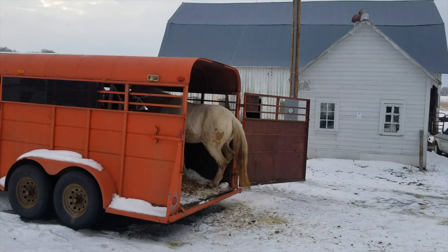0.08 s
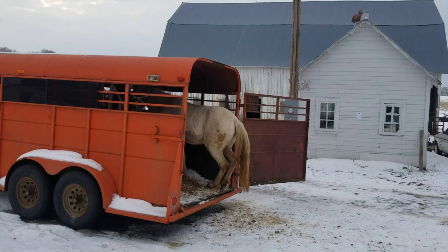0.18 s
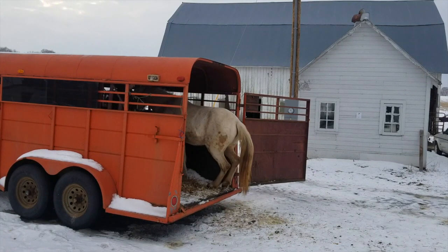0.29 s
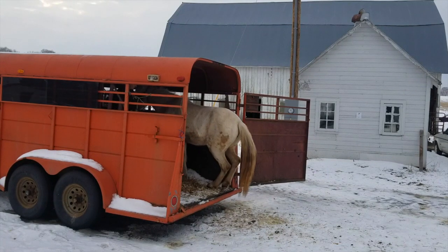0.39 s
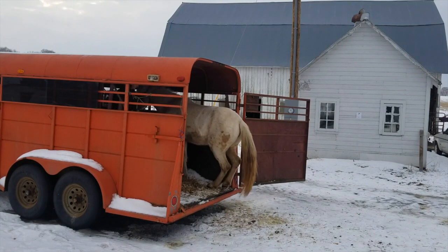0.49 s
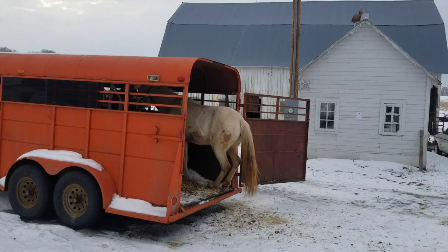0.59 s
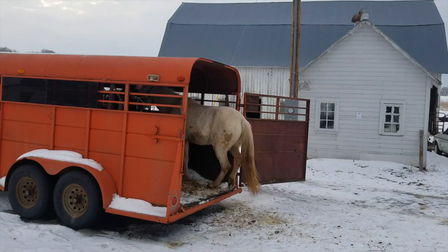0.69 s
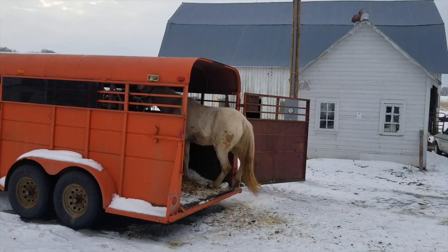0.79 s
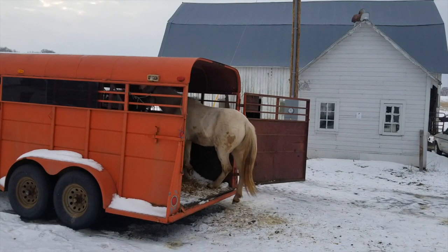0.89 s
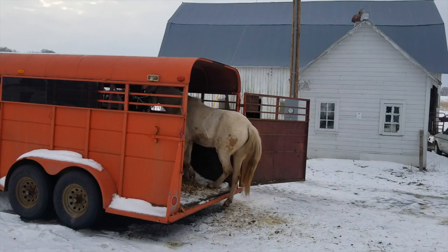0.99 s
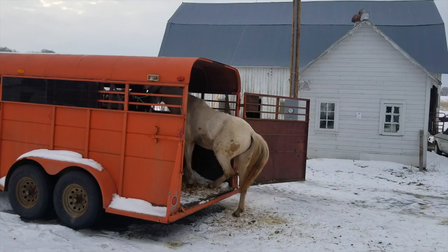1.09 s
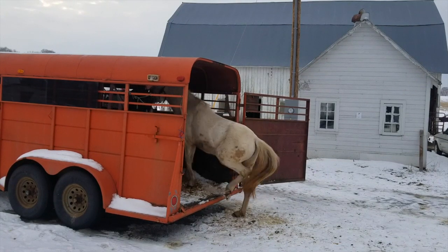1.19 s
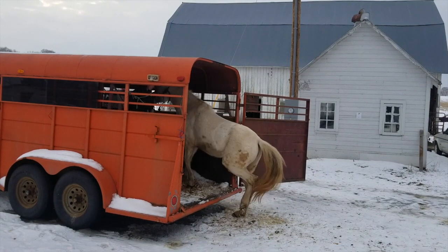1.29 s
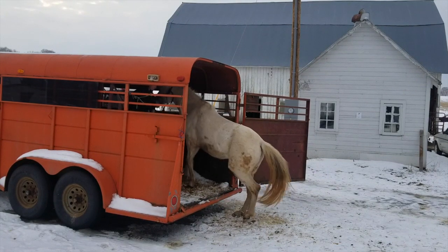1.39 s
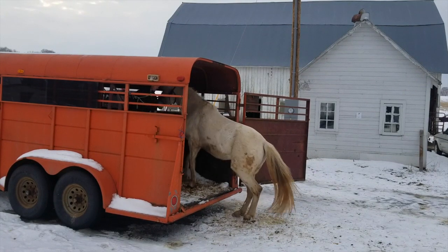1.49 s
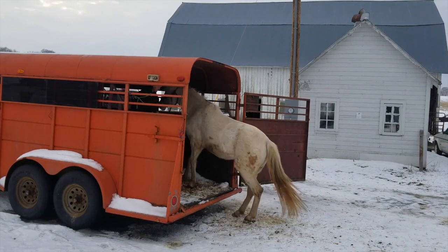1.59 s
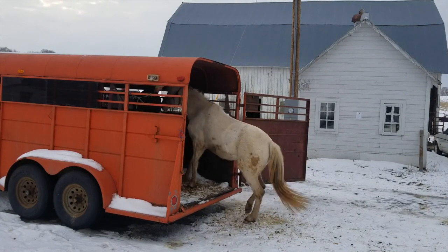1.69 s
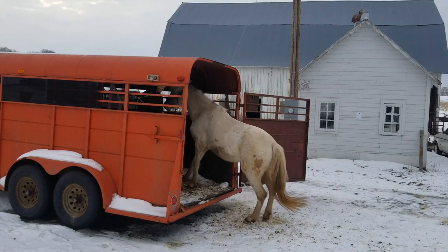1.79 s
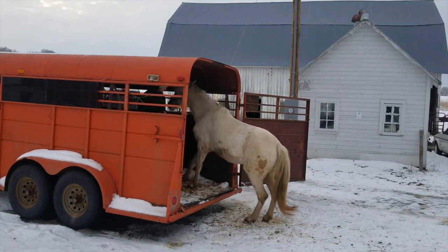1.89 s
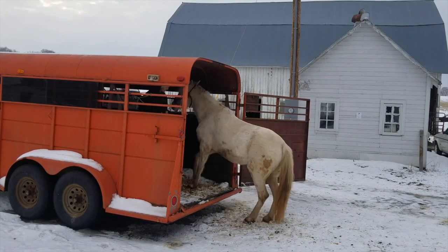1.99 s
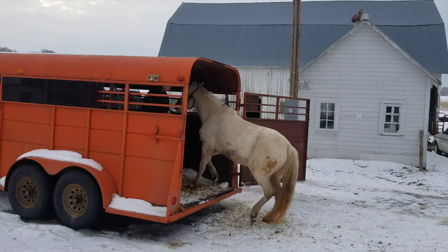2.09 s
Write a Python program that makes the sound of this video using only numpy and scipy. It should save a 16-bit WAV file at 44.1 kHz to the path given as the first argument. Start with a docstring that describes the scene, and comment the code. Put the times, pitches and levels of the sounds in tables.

```python
"""Horse hooves crunch and scrape over snow and grit as the horse backs out of a steel trailer into a yard.
Grinding is filtered noise full of tiny grains; sharp snaps and one rising slip stand out.
Blows ring the trailer and rattle its metal, the floor booms and rings on, and wind and yard hush lie under all.
A phone a few metres away listens through an open port and a covered one that hears mainly the bass."""
import sys
import numpy as np
from scipy import signal
from scipy.fft import rfft, irfft
from scipy.io import wavfile
from scipy.ndimage import uniform_filter1d

SR = 44100
rng = np.random.default_rng(int(sys.argv[2]) if len(sys.argv) > 2 else 0)


def decibels_to_gain(level_db):
    """Convert a level in decibels to a linear amplitude gain (20 dB per decade)."""
    exponent = np.asarray(level_db, float) / 20
    return 10 ** exponent


def to_wav(s):
    """Save 16-bit WAV."""
    ch = np.atleast_2d(s).T  # columns
    pcm = np.round(np.clip(ch, -1, 1) * 32767)  # PCM
    wavfile.write(sys.argv[1], SR, pcm.astype(np.int16))


N = 92610  # samples, 2.1 s

# Source levels are those before the gain of the ports.
# the floor flexes under shifting weight: start_s, length_s, level_db, pitch_hz
FLOOR_BOOMS = [(.0, 0.053, -48, 106), (0.085, 0.16, -55, 40.1), (.196, 0.029, -39, 89),
               (0.208, 0.084, -26, 72), (0.264, 0.34, -48, 51.3), (0.835, 0.049, -49, 68.7),
               (1.091, 0.052, -41.5, 90.5), (1.117, 0.13, -43, 41.2), (1.152, 0.054, -40.5, 90),
               (1.208, 0.076, -50.5, 96.6), (1.276, 0.082, -50, 43), (1.43, 0.11, -56.5, 47.8)]
# hooves grinding on snow and grit, one list per scrape: time_s, crunch_level_db, body_relative_db
GRINDS = [
    [(0.0, -52.5, 1.5), (0.026, -69, -16), (0.03, -62, -7), (0.07, -67.5, -1.5), (0.096, -77, 6.5),
     (0.126, -69, -1.5), (0.184, -68, -4), (0.195, -45, 6)],
    [(0.558, -86, 5), (0.57, -72, 0), (0.636, -61.5, -6), (0.646, -65, -1.5), (0.686, -70.5, -9),
     (0.704, -71, -1.5), (0.72, -67, -3)],
    [(1.055, -91, -14), (1.07, -62, -11), (1.078, -49, -6.5), (1.09, -52, 1), (1.115, -43, -3),
     (1.134, -46.5, 0), (1.153, -38.5, -1.5), (1.175, -54.5, -4), (1.22, -65, -2.5), (1.291, -68.5, -12),
     (1.33, -62, -7)],
    [(1.325, -76, -1), (1.344, -65, -20), (1.348, -46.5, -23), (1.361, -48, -10.5), (1.379, -61, -2),
     (1.395, -67.5, -1.5), (1.529, -66, -10.5), (1.54, -72, 6)],
    [(1.564, -83, 4), (1.584, -76, -30), (1.588, -68, -25), (1.612, -64, -23.5), (1.636, -63.5, -9.5),
     (1.758, -70, 1.5), (1.775, -55, -10)],
    [(1.775, -62, 3), (1.788, -66.5, 3), (1.797, -51.5, -22), (1.803, -51, -8), (1.819, -59, -7.5),
     (1.827, -55.5, -17), (1.849, -70, 0), (1.875, -61, -8)],
    [(1.86, -74, 2), (1.878, -66.5, -10), (1.934, -58.5, -8.5), (2.002, -62.5, -8.5), (2.03, -59, -15.5),
     (2.084, -70.5, -5), (2.1, -72, -9)],
]
# bright crunch of the grit, relative: pitch_hz, density_db_per_hz
CRUNCH_COLOUR = [(1120, -23), (1900, -31), (2440, -9), (2600, -1), (3100, 0), (4160, 3.5), (4630, -3.5),
                 (5070, -18), (6330, -9.5), (7630, -35.5), (10500, -40), (12300, -21.5), (13200, -24),
                 (14400, -16), (16000, -33)]
# duller thump below the crunch, relative: pitch_hz, density_db_per_hz
BODY_COLOUR = [(120, -32.5), (220, 6), (350, -1.5), (550, -4.5), (800, -4.5), (1070, 0.5), (1500, -0.5),
               (2100, -8), (2600, -32.5)]
# yard hush and wind, relative: pitch_hz, density_db_per_hz
HUSH_COLOUR = [(20, -11.5), (35, 0), (65, -4), (100, -2.5), (130, -5), (200, -16.5), (320, -14.5),
               (500, -40.5), (900, -34), (1700, -40.5), (2200, -16.5), (2750, -14), (3400, -23.5),
               (4200, -22.5), (4900, -42), (6300, -34), (7300, -55.5), (12500, -43.5), (13500, -32),
               (14200, -26), (15000, -27.5), (15700, -34)]
# hoof blows on the trailer: start_s, level_db, push_length_s, rattle_t60_s
BLOWS = [(.002, -48.5, 0.0048, 0.31), (0.192, -45.5, 0.00083, 1.1), (0.215, -40.5, 0.0022, 1.8),
         (0.264, -43.5, 0.0039, 0.98), (0.581, -45.5, 0.0034, 0.35), (1.075, -41, 0.0017, 0.15),
         (1.119, -38, 0.00086, 0.14), (1.141, -36.5, 0.0012, 0.59), (1.168, -53, 0.0043, 1.2),
         (1.735, -60, 0.0013, 0.23)]
# ringing modes of the trailer: pitch_hz, relative_level_db, longest_t60_s
TRAILER_MODES = [(42, -30, .5), (64, -30, .8), (90, -28, .5), (108, -28, .4), (163, -28, .5),
                 (237, -25, .5), (270, -22, .3), (320, -25, .5), (362, -24, .4), (447, -28, .5),
                 (564, -24, .25), (668, -27, .6), (715, -26, .3), (880, -29, .3), (1075, -26, .2),
                 (1320, -29, .2), (1610, -30, .15)]
# sheet-metal rattle after a blow, relative: pitch_hz, density_db_per_hz
RATTLE_COLOUR = [(60, -4.5), (150, 5), (300, -2), (500, -6.5), (800, -11), (1200, -14.5), (1600, -14.5),
                 (2200, -24.5), (4500, -24.5), (6000, -57)]
# single grit snaps: start_s, snap_level_db, knock_relative_db, knock_pitch_hz
SNAPS = [(.193, -50, 5.5, 1490), (0.202, -52, 10, 1330), (.2045, -59, 15.5, 660), (1.076, -38, 2.5, 388),
         (1.12, -43, -18, 1070), (1.143, -36, 0.5, 570), (1.1538, -32.5, -9, 1050), (1.3474, -43, -20, 600),
         (1.3505, -46, -17, 610), (1.3547, -38.5, -27, 1500), (1.3612, -37, -7.5, 970),
         (1.495, -54.5, 0.5, 920), (1.584, -46, -35, 600), (1.5996, -57, -25, 593), (1.633, -50, -24, 600),
         (1.6428, -46, -27, 604), (1.6496, -43, -33, 600), (1.678, -44, -28, 596),
         (1.7404, -54.5, 4.5, 490), (1.7972, -40, -12, 1420), (1.803, -45, 1.5, 994), (1.809, -49, 3, 1370),
         (1.826, -47.5, -1, 1410), (2.001, -48, -29, 600), (2.0106, -45.5, -29, 600),
         (2.0239, -43.5, -15, 1140), (2.033, -44.5, -34, 600)]
# the floor rings on, wavering as weight shifts: time_s, pitch_hz, rms_level_db
FLOOR_RING = [(0.268, 73.76, -61), (.285, 78.2, -41.5), (0.334, 75.5, -46.5), (.38, 63.8, -43.5),
              (.42, 76.3, -47), (.47, 67.2, -47.5), (.505, 72.5, -53.5), (0.534, 78.7, -49),
              (0.571, 73.7, -59), (.625, 69.5, -46.5), (.67, 78, -56), (.7, 82, -65.5), (.75, 82.8, -59.5),
              (0.809, 76, -68)]
# a hoof slips with a rising chirp: start_s, length_s, level_db, from_pitch_hz, to_pitch_hz
SLIP = (1.111, .017, -39, 550, 1350)
# covered port against the open one: pitch_hz, relative_level_db, lag_radians
COVER = [(30, -2.7, .27), (110, -2.9, .3), (170, -3.8, .45), (260, -4.9, .74), (470, -6, 1.),
         (620, -6.3, 1.28), (740, -8, 1.62), (900, -10.5, 1.68), (1130, -8.5, 1.9), (1260, -9, 2.4),
         (1380, -14.5, 2.66), (1520, -20.5, 2.76), (1950, -19, 3.3), (2240, -27, 4.5), (2600, -42, 5),
         (3400, -55, 5.5), (16000, -55, 6)]
# hiss of each port, relative: pitch_hz, density_db_per_hz
SELF_NOISE_COLOUR = [(30, 15.5), (150, 21.5), (300, 18.5), (700, 3), (1500, 7), (3000, 1.5), (8000, -2.5),
                     (16000, 1)]
# hiss of the open port, then the covered one: rms_level_db
SELF_NOISE_DB = [-67.5, -72]

GRAINS_PER_S, HISS_SHARE = 1400, 0.45
GRAIN_SPREAD_DB, GRAIN_CAP_DB = 3.5, 10
GRIND_FADE_S = 0.015
SILL_DB, SILL_T60_S = -3, 0.16
YARD_DB, YARD_T60_S = -11, 0.17
HUSH_DB, GUST_DB, FLICKER_DB = -61, 0.7, 1.1
WHINE_HZ, WHINE_WIDTH_HZ, WHINE_DB = 14090, 90, -79
MODE_SCATTER_DB, RATTLE_DB = 3.5, -12
SNAP_RISE_S, SNAP_T60_S, KNOCK_T60_S = 0.0002, 0.009, 0.013
PORT_GAIN_DB, TOP_HZ = 3, 15800


def level(x, db):
    """Scale a sound to an rms level."""
    return x * decibels_to_gain(db) / np.sqrt(np.mean(x ** 2))


def colour(x, table):
    """Shape a sound's tone with a filter that never acts ahead of time (minimum phase)."""
    hz, db = np.array(table, float).T
    grid_hz = np.arange(4097) * SR / 8192
    gain = decibels_to_gain(np.interp(np.log(grid_hz + 1), np.log(hz), db))
    # folding the cepstrum forward in time gives the minimum phase
    cepstrum = irfft(np.log(gain))
    cepstrum[1:4096] *= 2
    cepstrum[4097:] = 0
    response = irfft(np.exp(rfft(cepstrum)))
    return signal.fftconvolve(x, response)[:N]


def colour_evenly(x, table):
    """Shape the tone with a filter that keeps the power of steady white noise."""
    tick = np.zeros(N)
    tick[0] = np.sqrt(N)
    return colour(x, table) / np.sqrt(np.mean(colour(tick, table) ** 2))


def band(x, lo_hz, hi_hz):
    """Let through only the sound between two pitches."""
    return signal.sosfilt(signal.butter(2, [lo_hz, hi_hz], "band", fs=SR, output="sos"), x)


def walk(rate_hz):
    """Draw random levels at a steady rate and smooth their steps twice."""
    hold = int(SR / rate_hz)
    steps = np.repeat(rng.standard_normal(N // hold + 1), hold)
    return uniform_filter1d(uniform_filter1d(steps, hold), hold)[:N]


def floor_booms(t):
    """The flexing floor gives low tones that swell and sink."""
    out = np.zeros(N)
    for start, length, db, hz in FLOOR_BOOMS:
        swell = np.sin(np.pi * np.clip((t - start) / length, 0, 1)) ** 2
        out += decibels_to_gain(db) * swell * np.sin(2 * np.pi * hz * (t - start))
    return out


def rub():
    """Rubbing grit is a dense patter of uneven grains over hiss."""
    happens = rng.random(N) < GRAINS_PER_S / SR
    size_db = np.minimum(-GRAIN_SPREAD_DB * np.log(1 - rng.random(N)), GRAIN_CAP_DB)
    grains = level(happens * decibels_to_gain(size_db) * rng.choice([-1., 1.], N), 0)
    return level(grains * (1 - HISS_SHARE) + HISS_SHARE * rng.standard_normal(N), 0)


def sill_ring(t, thump):
    """Hoof thumps ring the upper trailer modes in the sill, all dying away together."""
    t = t[:SR // 4]
    ring = sum(decibels_to_gain(db) * np.sin(2 * np.pi * hz * t) for hz, db, _ in TRAILER_MODES[5:])
    ring = ring * 1000. ** (-t / SILL_T60_S)
    ring /= np.sqrt(np.sum(ring ** 2))
    return decibels_to_gain(SILL_DB) * signal.fftconvolve(thump, ring)[:N]


def grinding(t):
    """Hooves grind grit into bright crunch and duller thump; the thump also rings the sill."""
    crunch_gain, body_gain = np.zeros((2, N))
    for rows in GRINDS:
        s, db, body_db = np.array(rows, float).T
        fade = np.clip(np.minimum(t - s[0], s[-1] - t) / GRIND_FADE_S, 0, 1)
        crunch_gain += fade * decibels_to_gain(np.interp(t, s, db))
        body_gain += fade * decibels_to_gain(np.interp(t, s, db + body_db))
    hard = rub()
    soft = level(rub() + hard, 0)  # the thump shares half its grains with the crunch
    thump = soft * body_gain
    crunch = colour_evenly(hard * crunch_gain, CRUNCH_COLOUR)
    return crunch + colour_evenly(thump, BODY_COLOUR) + sill_ring(t, thump)


def yard_wash(t, hooves):
    """Trailer walls and barns return the hoof sounds as a short fading blur."""
    t = t[:SR // 2]
    wash = rng.standard_normal(SR // 2) * 1000. ** (-t / YARD_T60_S)
    wash /= np.sqrt(np.sum(wash ** 2))
    return decibels_to_gain(YARD_DB) * signal.fftconvolve(hooves, wash)[:N]


def hush():
    """Wind and yard noise: octave bands swell together and flicker alone, with a thin steady whine."""
    air = colour(rng.standard_normal(N), HUSH_COLOUR)
    gust_db = GUST_DB * walk(1.17)
    out = np.zeros(N)
    for lo_hz in 18 * 2. ** np.arange(11):
        flicker_db = FLICKER_DB * walk(12)
        out += decibels_to_gain(gust_db + flicker_db) * band(air, lo_hz, min(2 * lo_hz, 20000))
    half_hz = WHINE_WIDTH_HZ / 2
    whine = band(rng.standard_normal(N), WHINE_HZ - half_hz, WHINE_HZ + half_hz)
    return level(out, HUSH_DB) + level(whine, WHINE_DB)


def trailer_blows(t):
    """Each blow pushes the trailer's modes into ringing and shakes a fading metal rattle."""
    out, shake_power = np.zeros((2, N))
    for start, db, push_s, rattle_s in BLOWS:
        age = np.maximum(t - start, 0)
        ring = np.zeros(N)
        for hz, mode_db, t60 in TRAILER_MODES:
            # each blow excites each mode a little differently
            gain = decibels_to_gain(mode_db + MODE_SCATTER_DB * rng.standard_normal())
            ring += gain * np.sin(2 * np.pi * hz * age) * 1000. ** (-age / min(t60, rattle_s))
        push = np.exp(-np.arange(1000) / SR / max(push_s, 1e-4) * np.pi)  # longer is softer
        out += decibels_to_gain(db) * signal.fftconvolve(ring, push / push.sum())[:N]
        shake_power += decibels_to_gain(2 * db) * (t > start) * 1000. ** (-2 * age / rattle_s)
    rattle = level(colour(rng.standard_normal(N), RATTLE_COLOUR), RATTLE_DB)
    return out + np.sqrt(shake_power) * rattle


def grit_snaps(t):
    """Single bits of grit snap as bursts of bright noise, each with a short pitched knock."""
    snap_gain, knocks = np.zeros((2, N))
    for start, db, knock_db, hz in SNAPS:
        age = np.maximum(t - start, 0)
        rise = 1 - np.exp(-age / SNAP_RISE_S)
        snap_gain += decibels_to_gain(db) * rise * 1000. ** (-age / SNAP_T60_S)
        knocks += decibels_to_gain(db + knock_db) * np.sin(2 * np.pi * hz * age) * 1000. ** (-age / KNOCK_T60_S)
    crackle = rng.choice([-1., 1.], N)
    return colour_evenly(snap_gain * crackle, CRUNCH_COLOUR) + knocks


def floor_ring(t):
    """The floor rings on after the stamp as one low tone of wavering pitch and level."""
    s, hz, db = np.array(FLOOR_RING).T
    gain = np.sqrt(2) * decibels_to_gain(np.interp(t, s, db, -200, -200))  # rms to peak; silent outside
    return gain * np.sin(2 * np.pi * np.cumsum(np.interp(t, s, hz)) / SR)


def hoof_slip(t):
    """A slipping hoof gives a brief tone whose pitch rises evenly."""
    start, length, db, lo_hz, hi_hz = SLIP
    part = np.clip((t - start) / length, 0, 1)
    cycles = length * (lo_hz * part + (hi_hz - lo_hz) * part ** 2 / 2)
    return decibels_to_gain(db) * np.sin(np.pi * part) * np.sin(2 * np.pi * cycles)


def scene():
    """Add all sources in the air, which reach both ports alike."""
    t = np.arange(N) / SR
    hooves = grinding(t) + grit_snaps(t) + hoof_slip(t)
    trailer = floor_booms(t) + trailer_blows(t) + floor_ring(t)
    air = trailer + hooves + yard_wash(t, hooves) + hush()
    return np.array([air, air])


def band_limit(x):
    """A steep low-pass at the top of the band."""
    return signal.sosfilt(signal.butter(12, 15790, fs=SR, output="sos"), x)


def record(dry):
    """The covered port is dull and late; each port hisses on its own and loses the top treble."""
    hz, db, lag = np.array(COVER).T
    grid_hz = np.arange(N // 2 + 1) * SR / N

    def along_pitch(values):
        return np.interp(np.log(grid_hz + 1), np.log(hz), values)

    cover = decibels_to_gain(along_pitch(db)) * np.exp(-1j * along_pitch(lag))
    covered = irfft(rfft(dry[1]) * cover, N)
    ports = decibels_to_gain(PORT_GAIN_DB) * np.array([dry[0], covered])
    hiss = [level(colour(rng.standard_normal(N), SELF_NOISE_COLOUR), rms_db) for rms_db in SELF_NOISE_DB]
    low_pass = signal.ellip(8, 0.2, 70, TOP_HZ, fs=SR, output="sos")
    mix = signal.sosfilt(low_pass, ports + np.array(hiss))
    return band_limit(mix)


dry = scene()
out = record(dry)
to_wav(out)
```